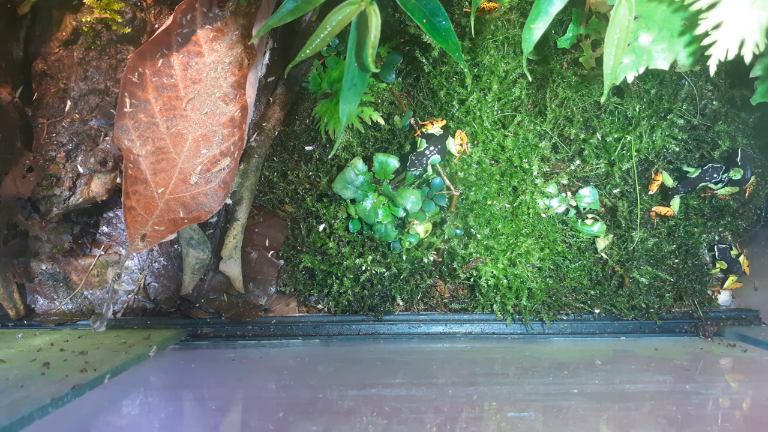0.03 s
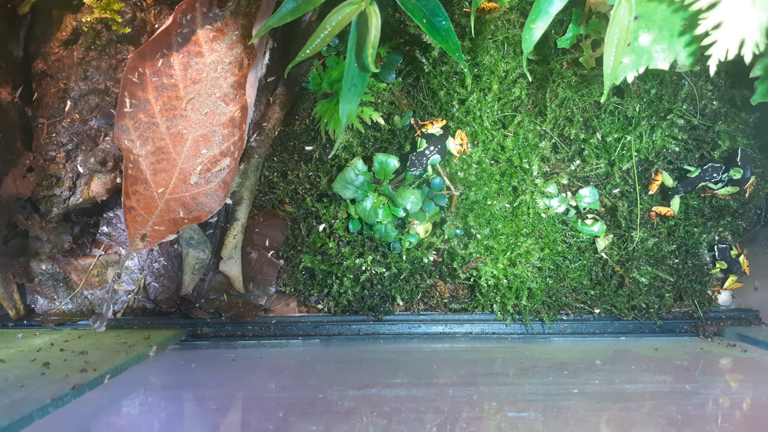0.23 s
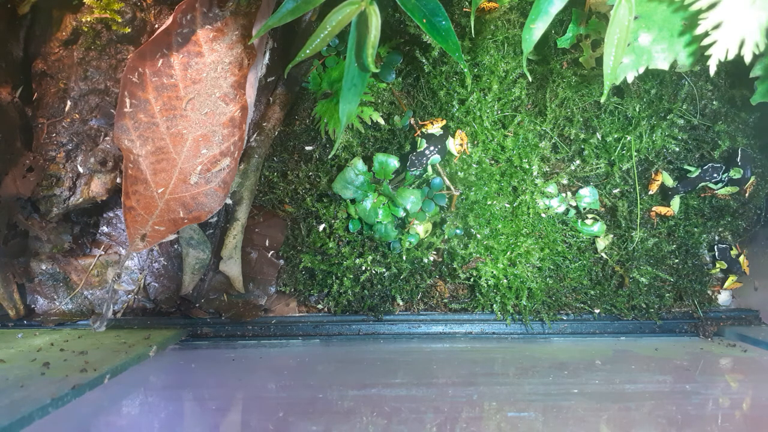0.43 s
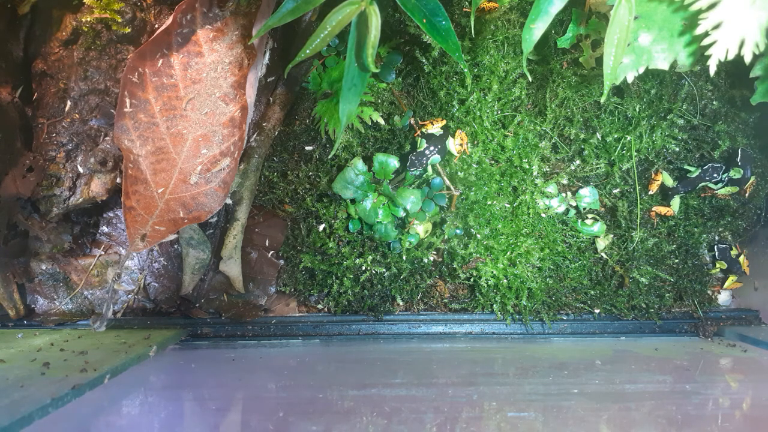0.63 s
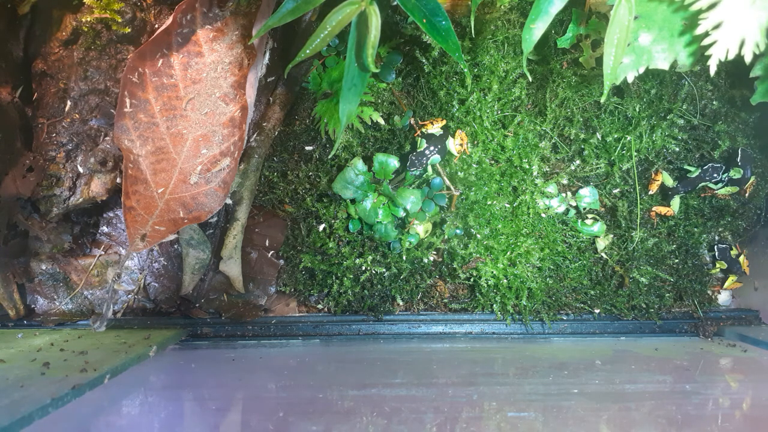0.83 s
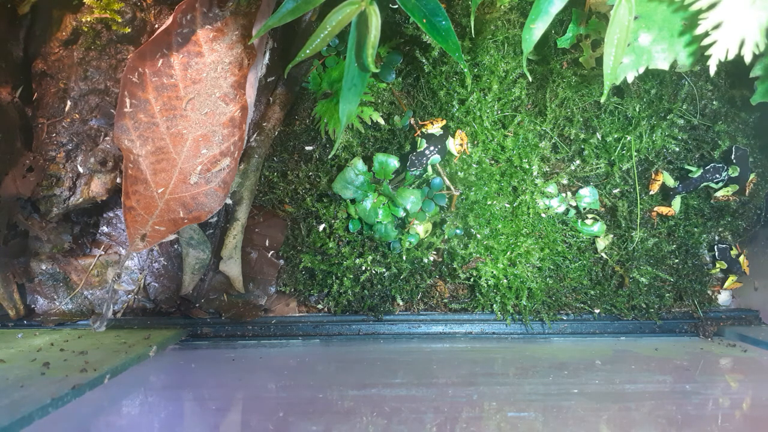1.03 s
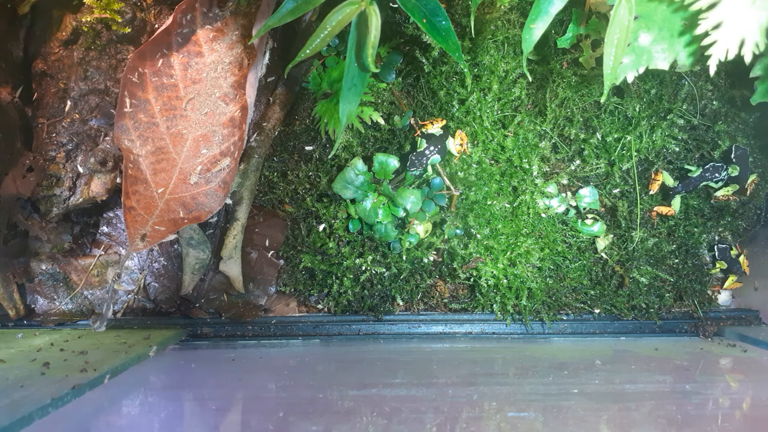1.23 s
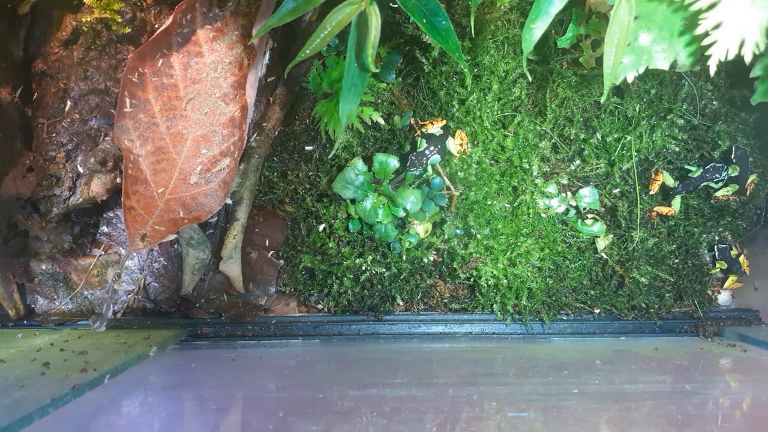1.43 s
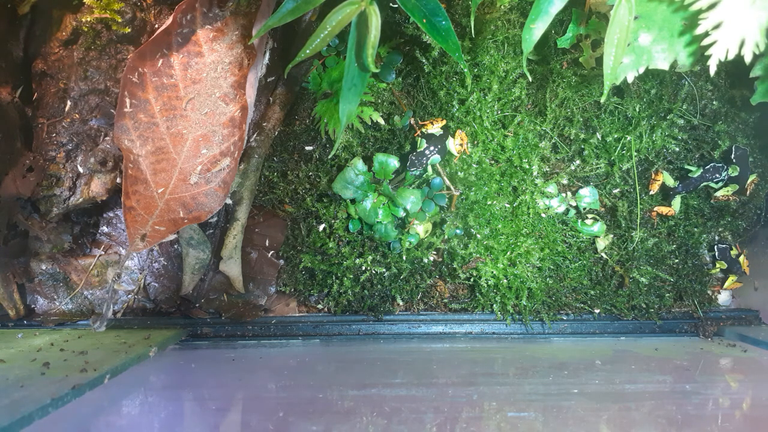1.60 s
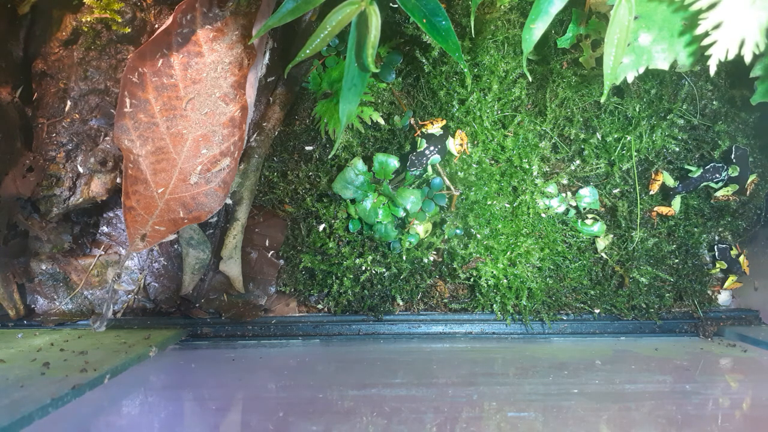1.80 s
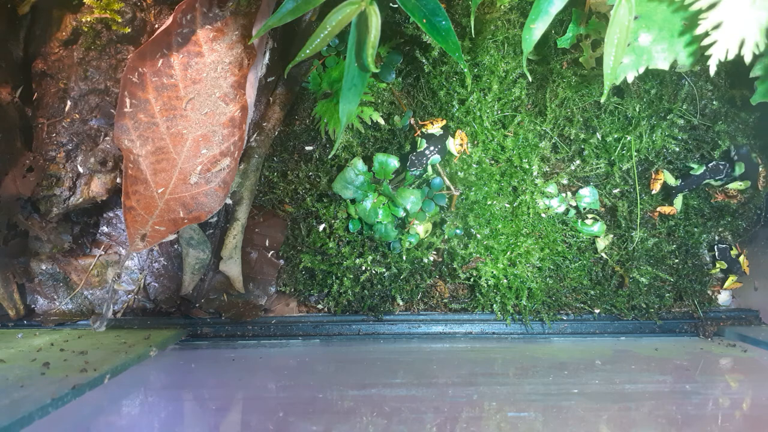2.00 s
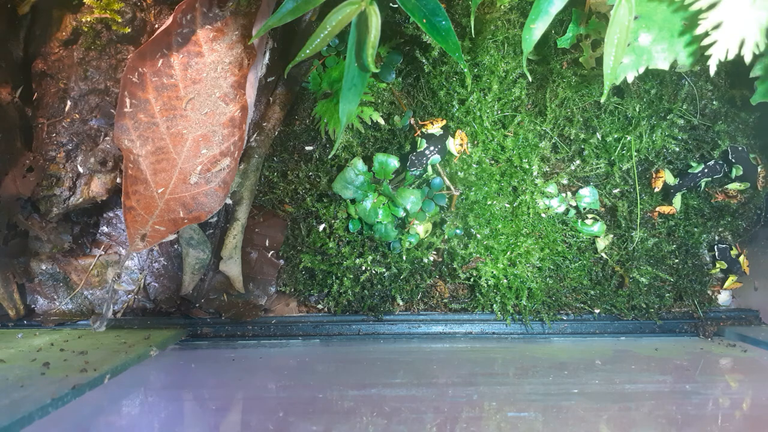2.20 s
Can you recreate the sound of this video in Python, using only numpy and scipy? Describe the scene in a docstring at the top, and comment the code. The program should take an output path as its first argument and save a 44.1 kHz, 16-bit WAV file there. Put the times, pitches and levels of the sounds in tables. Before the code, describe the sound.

A small frog chirps close by, left of centre, at about 0.2 seconds and again, slightly softer, at 1.2 seconds. Each chirp is a very short, high, falling whistle with a raspy start, ringing briefly off the glass tank and room. Far quieter are a soft bump at 0.6 seconds and scattered rustles, mostly around 2 seconds. Faint equipment hum and whir continue throughout.

```python
"""Frog in a glass terrarium

A quiet room, two microphones. Left of centre a small frog chirps twice: very short, falling whistles
with a raspy onset and two faint overtones. The nearby panes throw each back at once and the room rings
after it. Far below the frog in level: a few rustles, one soft bump, the hum and whir of equipment."""
import sys
import numpy as np
from scipy import signal
from scipy.io import wavfile

SR = 44100
rng = np.random.default_rng(int(sys.argv[2]) if len(sys.argv) > 2 else 0)


def waveform_to_disk(signal):
    """Save audio, clipped to [-1, 1], as 16-bit WAV at the path in sys.argv[1]."""
    frames = np.transpose(np.atleast_2d(signal))
    scaled = np.clip(frames, -1, 1) * 32767
    samples = np.round(scaled).astype(np.int16)
    wavfile.write(sys.argv[1], SR, samples)


N = 103635

# the calls: t/s, level/dB, attack/s, length/s, final f/Hz, fall/Hz, 2nd harmonic/dB, 3rd harmonic/dB,
# rasp/dB, pan L-R/dB
CHIRPS = [(0.2288, -23, 0.005, .021, 4274, 500, -32.5, -23, -18, 6),
          (1.236, -26, 0.0041, 0.014, 4211, 280.7, -34.5, -36.5, -25.5, 7.5)]
RELEASE_SHARE, FALL_S = .35, .009   # share of the length; time scale of the downward slide
FLUTTER_HZ, FLUTTER_RATE_HZ = 70, 460   # unsteady pitch: depth, speed
# resonances of the raspy onset: multiple of the starting pitch, width/Hz, relative level/dB
RASP_RESONANCES = [(.63, 758, -5.5), (1.06, 647.3, 0.5), (1.45, 899, -16)]
RASP_RISE_S, RASP_DECAY_S = .0011, .0052
# reflections off the glass, left then right microphone: delay/s, gain/dB
PANE_ECHOES = [
    [(.0031, -3.5), (.0068, -4.5), (.0135, -10.5), (.021, -15)],
    [(.0024, 0), (.0092, -11), (.0148, -12), (.024, -15.5)],
]
TANK_DB, TANK_T60_S, ECHO_BUILD_S = -11, .12, .059
ROOM_DB, ROOM_T60_S, ROOM_PAN_DB, ROOM_BAND_HZ = -5.5, .39, 3.5, (4100, 7700)
# rustles: t/s, length to mid-fade/s, level/dB, tilt/(dB per octave)
RUSTLES = [(0.248, 0.18, -66, 1), (0.62, 0.079, -69.5, 3), (0.727, 0.11, -71, 7.5), (1.245, 0.15, -61, 1.5),
           (1.941, 0.11, -66.5, 2), (2.064, 0.12, -63, 3.5), (2.1, 0.14, -68, -1), (2.184, 0.12, -65.5, -1),
           (2.305, 0.078, -68, 0)]
# rustle spectrum before the tilt: f/Hz, relative density/dB
RUSTLE_SPECTRUM = [(150, -6), (300, 3.5), (1200, 2.5), (2400, -1.5), (4500, -4.5), (8500, -17),
                   (10500, -30.5), (15500, -24)]
RUSTLE_RISE_S, RUSTLE_FALL_S, RUSTLE_BUMP_PAN_DB = .0033, .16, 5
# bump spectrum: f/Hz, relative density/dB
BUMP_SPECTRUM = [(100, -13), (350, 6), (700, 9.5), (1400, -3.5), (3000, -11), (8000, -43)]
BUMP_AT_S, BUMP_DB, BUMP_T60_S, BUMP_TAIL_DB, BUMP_TAIL_T60_S = .607, -58, .08, -8, 1
# mains hum and its buzz: f/Hz, level/dB
HUM_TONES = [(99.5, -72), (150, -84), (366, -85.5), (550, -78.5), (600, -78.5), (650, -76.5), (700, -88.5),
             (1200, -83)]
HUM_WAVER, HUM_WAVER_PER_S, HUM_PAN_DB, WHIR_PAN_DB = .35, 14, 10, 9.5
# resonances of the whirring equipment: f/Hz, width/Hz, level/dB
WHIR_RESONANCES = [(44.4, 4, -84), (107, 25, -90.5), (1518, 30, -76), (1603, 40, -73.5)]
# room tone spectrum: f/Hz, relative density/dB
ROOM_TONE_SPECTRUM = [(30, 2), (48, -7.5), (70, -13.5), (110, -5.5), (200, -19.5), (340, -12), (450, -18),
                      (620, -12.5), (950, -13.5), (1550, -13.5), (2000, -15), (2550, -22), (3200, -30),
                      (4500, -25), (6000, -29.5), (11000, -35), (15500, -34.5)]
# room tone balance: f/Hz, pan L-R/dB
ROOM_TONE_PAN = [(60, 7), (300, 4.5), (1200, 9), (3000, 5), (14000, 4)]
# room tone over time: t/s, level/dB
ROOM_TONE_LEVEL = [(0, -68.5), (0.171, -68), (0.351, -65), (0.901, -66.5), (1.2, -67), (1.6, -65.5),
                   (1.902, -65), (2.35, -64)]
# how alike noise is at the two microphones: f/Hz, correlation
MIC_CORRELATION = [(50, 0.44), (200, 0.48), (600, -0.026), (1200, -0.3), (3000, 0), (12000, 0.031)]
# peaks and dips, left then right microphone: f/Hz, width/Hz, gain/dB
MIC_COLOURS = [
    [(8630, 1268, 4), (10140, 560, -5.5)],
    [(3190, 2300, 1.5), (8600, 1300, -4.5)],
]
LOW_CUT_HZ, HIGH_CUT_HZ = 38, 15600


def frog():
    """The chirps reach the microphones with the ring of the tank and of the room."""
    out = 0
    for *call, pan_db in CHIRPS:
        direct = chirp(*call)
        room = band(reverb(direct, ROOM_T60_S), ROOM_BAND_HZ)
        tank = panes(direct) + from_db(TANK_DB) * reverb(direct, TANK_T60_S)
        out = out + pan(pan_db) * tank + from_db(ROOM_DB) * pan(ROOM_PAN_DB) * room
    return out


def chirp(start, db, attack, length, end_hz, fall_hz, second_db, third_db, rasp_db):
    """One whistle that starts with a rasp and slides down, fluttering, as the frog's push fades."""
    t = np.maximum(np.arange(N) / SR - start, 0)
    effort = swell(t, length, attack, RELEASE_SHARE * length) * np.clip(t / attack, 0, 1)
    flutter = FLUTTER_HZ * unit_rms(band(rng.standard_normal(N), FLUTTER_RATE_HZ, "low"))
    pitch = end_hz + fall_hz * np.exp(-(t / FALL_S) ** 2) + flutter
    phase = 2 * np.pi * np.cumsum(pitch) / SR
    overtones = from_db(second_db) * np.sin(2 * phase) + from_db(third_db) * np.sin(3 * phase)
    overtones *= swell(t, length, attack, length / 2)   # these fade first
    onset = from_db(rasp_db) * rasp(t, end_hz + fall_hz)
    return from_db(db) * (effort * np.sin(phase) + overtones + onset)


def rasp(t, start_hz):
    """A chirp's noisy edge: a quick burst in resonances around the starting pitch."""
    noise = 0
    for ratio, width, db in RASP_RESONANCES:
        hz = ratio * start_hz
        noise += from_db(db) * unit_rms(band(rng.standard_normal(N), [hz - width / 2, hz + width / 2]))
    return noise * np.clip(t / RASP_RISE_S, 0, 1) * np.exp(-t / RASP_DECAY_S)


def panes(x):
    """The direct sound and its first reflections off the nearby glass."""
    n = np.arange(N)
    return np.array([x + sum(from_db(db) * np.interp(n - round(s * SR), n, x, left=0) for s, db in mic)
                     for mic in PANE_ECHOES])


def reverb(x, t60):
    """Dense echoes that build up and die away, different at each microphone."""
    t = np.arange(SR) / SR
    echoes = rng.standard_normal((2, SR)) * from_db(-60 * t / t60) * np.clip(t / ECHO_BUILD_S, 0, 1)
    wet = signal.fftconvolve(x[None], echoes, axes=1)[:, :N]
    return wet * np.std(x) / np.std(wet, axis=1, keepdims=True)


def rustles():
    """Faint brushing to the left, now brighter, now duller."""
    t, out = np.arange(N) / SR, 0
    hz, bands = noise_bands(RUSTLE_SPECTRUM)
    for start, length, db, tilt_db in RUSTLES:
        noise = unit_rms(np.tensordot(from_db(tilt_db * np.log2(hz)), bands, 1))
        envelope = swell(t - start, length + RUSTLE_FALL_S / 2, RUSTLE_RISE_S, RUSTLE_FALL_S)
        out = out + from_db(db) * noise * envelope
    return out * pan(RUSTLE_BUMP_PAN_DB)


def bump():
    """One soft, dull knock that lingers in the room."""
    t = np.maximum(np.arange(N) / SR - BUMP_AT_S, 0)
    fade = from_db(-60 * t / BUMP_T60_S) + from_db(BUMP_TAIL_DB - 60 * t / BUMP_TAIL_T60_S)
    _, bands = noise_bands(BUMP_SPECTRUM)
    return pan(RUSTLE_BUMP_PAN_DB) * (t > 0) * from_db(BUMP_DB) * fade * bands.sum(axis=0)


def equipment():
    """Well to the left: wavering mains hum, and noise whirring in narrow resonances."""
    t, hum, whir = np.arange(N) / SR, 0, 0
    for hz, db in HUM_TONES:
        waver = 1 + HUM_WAVER * (drift(HUM_WAVER_PER_S) + 1j * drift(HUM_WAVER_PER_S))   # level, phase
        hum = hum + from_db(db) * np.real(waver * np.exp(2j * np.pi * (hz * t + rng.random())))
    for hz, width, db in WHIR_RESONANCES:
        octave = band(rng.standard_normal((2, N)), [hz / np.sqrt(2), hz * np.sqrt(2)])
        mid, side = resonate(octave, hz, width)
        whir = whir + from_db(db) * unit_rms(stereo(mid, side, hz))
    return pan(HUM_PAN_DB) * hum + pan(WHIR_PAN_DB) * whir


def room_tone():
    """Nearly steady room noise, stronger at the left microphone."""
    noise = sum(pan(at_hz(ROOM_TONE_PAN, hz)) * x for hz, x in zip(*noise_bands(ROOM_TONE_SPECTRUM)))
    level_db = np.interp(np.arange(N) / SR, *np.transpose(ROOM_TONE_LEVEL))
    return from_db(level_db) * noise


def microphone(x, colour):
    """Broad peaks and dips of one microphone."""
    for hz, width, db in colour:
        x = x + (from_db(db) - 1) * resonate(x, hz, width)
    return x


def noise_bands(spectrum):
    """Stereo noise in narrow bands that sum to unit level: (centres, bands)."""
    edges = np.geomspace(30, 16500, 29)
    centres = np.sqrt(edges[1:] * edges[:-1])
    white, bands = rng.standard_normal((2, 2, N)), []
    for k, hz in enumerate(centres):
        mid, side = band(white[k % 2], edges[k:k + 2])
        bands.append(from_db(at_hz(spectrum, hz)) * stereo(mid, side, hz))
    return centres, np.array(bands) / np.std(sum(bands))


def stereo(mid, side, hz):
    """Two noises mixed to left and right, as alike as the microphones hear this frequency."""
    alike = at_hz(MIC_CORRELATION, hz)
    return np.sqrt(1 + alike) * mid + np.sqrt(1 - alike) * side * [[1], [-1]]


def swell(t, length, rise, fall):
    """Rounded attack, hold and release."""
    attack = np.sin(np.pi / 2 * np.clip(t / rise, 0, 1))
    return attack * np.sin(np.pi / 2 * np.clip((length - t) / fall, 0, 1)) ** 2


def drift(rate):
    """Random wander of spread about 1."""
    knots = rng.standard_normal(200)
    return np.interp(np.arange(N) / SR * rate, np.arange(len(knots)), knots)


def resonate(x, hz, width):
    """One resonance with unit gain at its peak."""
    return signal.lfilter(*signal.iirpeak(hz, hz / width, fs=SR), x)


def band(x, edges, kind="band"):
    """Butterworth filter."""
    return signal.sosfilt(signal.butter(2, np.clip(edges, 10, .45 * SR), kind, fs=SR, output="sos"), x)


def at_hz(points, hz):
    """Read a table on a log-frequency axis."""
    freqs, values = np.transpose(points)
    return np.interp(np.log(hz), np.log(freqs), values)


def pan(db):
    """Left and right gains for a level difference."""
    return from_db(np.array([[db], [-db]]) / 2)


def unit_rms(x):
    """Scale to unit level."""
    return x / np.sqrt(np.mean(x ** 2) + 1e-20)


def from_db(db):
    """Decibels to gain."""
    return 10 ** (np.asarray(db) / 20)


def scene():
    """The frog over the quiet room."""
    return frog() + rustles() + bump() + equipment() + room_tone()


def record(dry):
    """Each microphone adds its colour; the deepest bass and the top are cut."""
    heard = np.array([microphone(x, colour) for x, colour in zip(dry, MIC_COLOURS)])
    heard = signal.sosfilt(signal.butter(10, LOW_CUT_HZ, "high", fs=SR, output="sos"), heard)
    return signal.sosfilt(signal.ellip(10, .1, 70, HIGH_CUT_HZ, fs=SR, output="sos"), heard)


dry = scene()
out = record(dry)
waveform_to_disk(out)
```